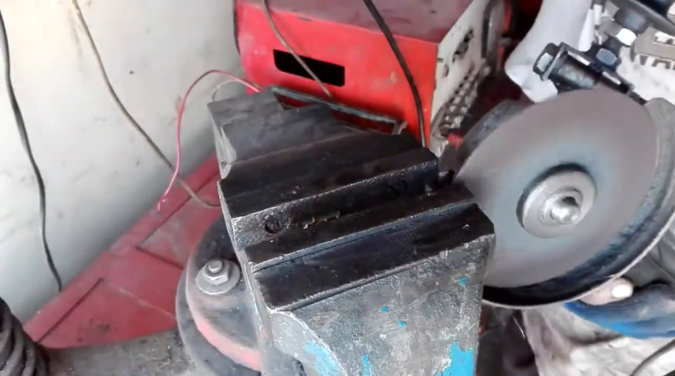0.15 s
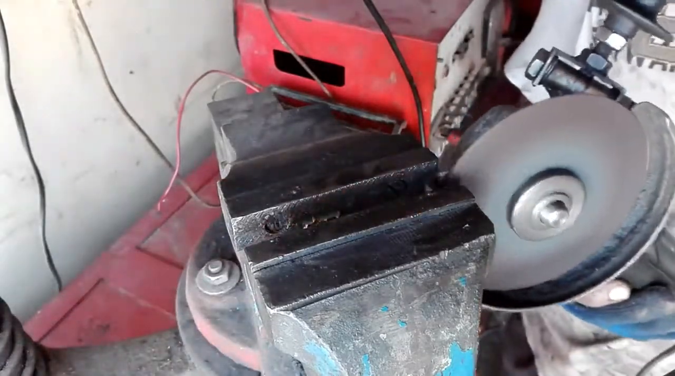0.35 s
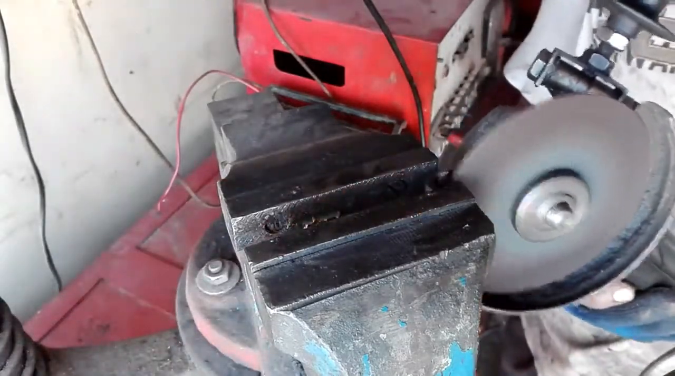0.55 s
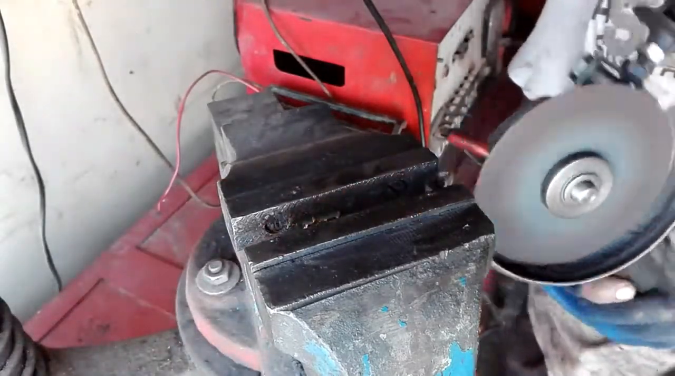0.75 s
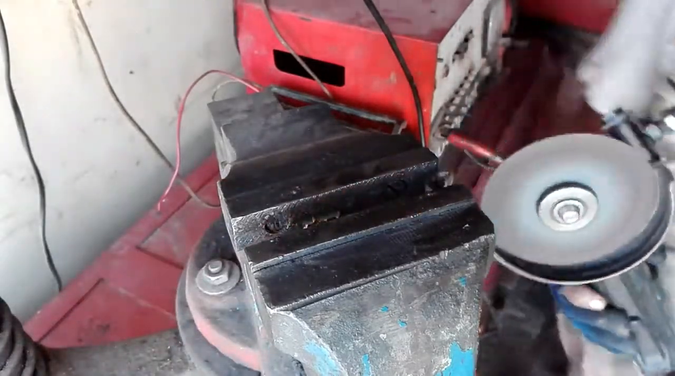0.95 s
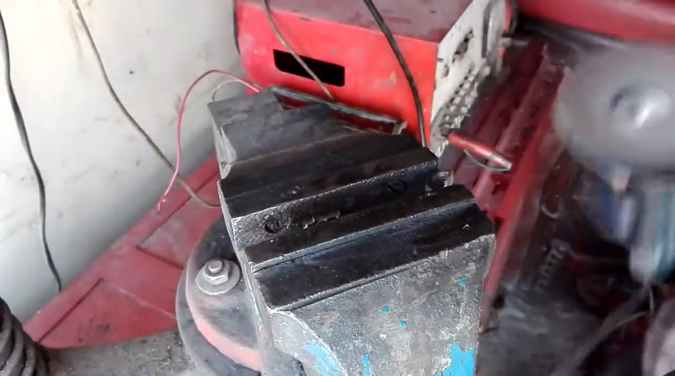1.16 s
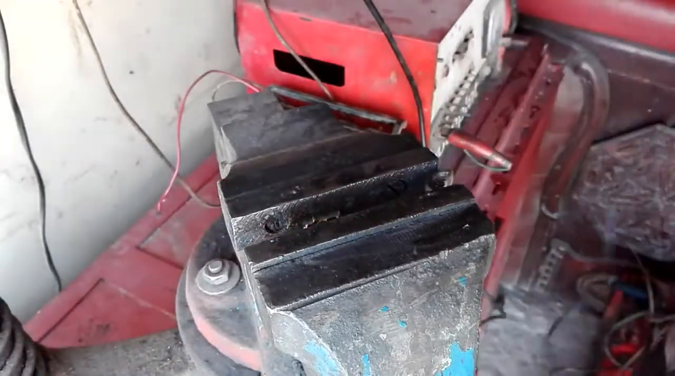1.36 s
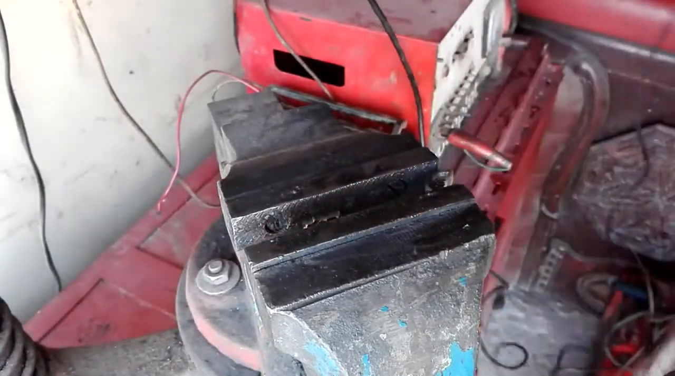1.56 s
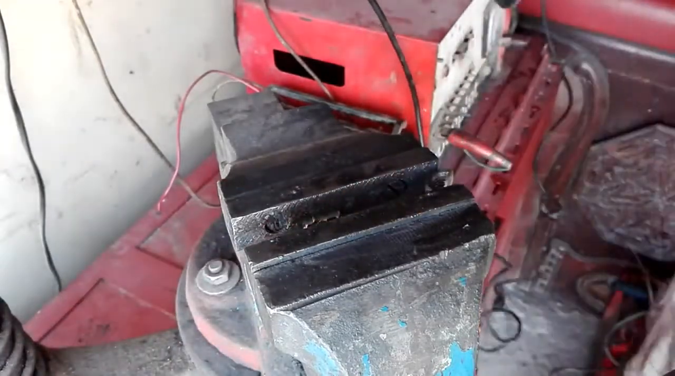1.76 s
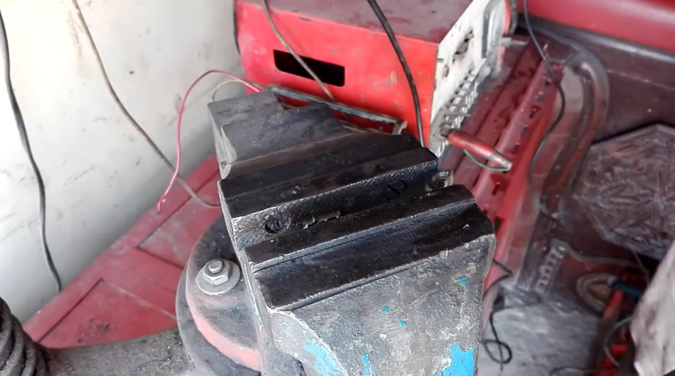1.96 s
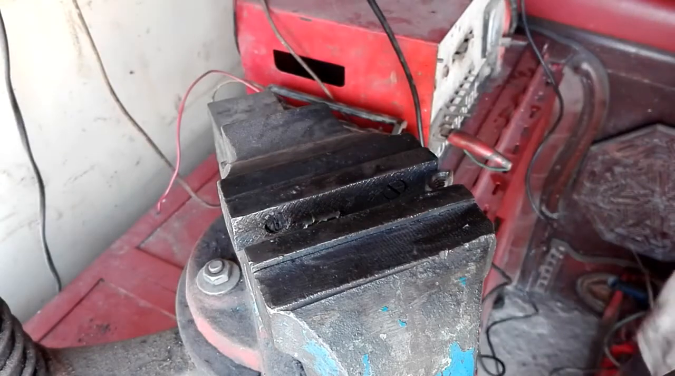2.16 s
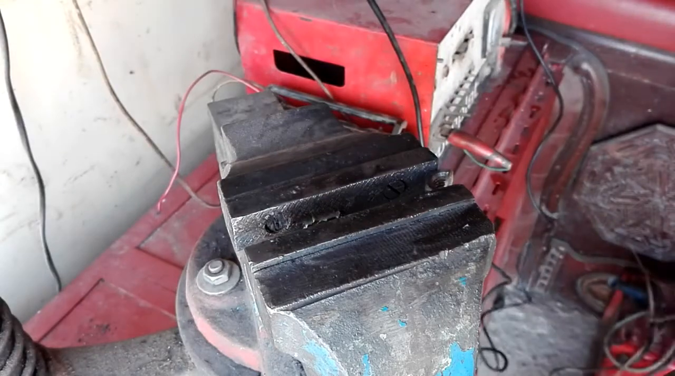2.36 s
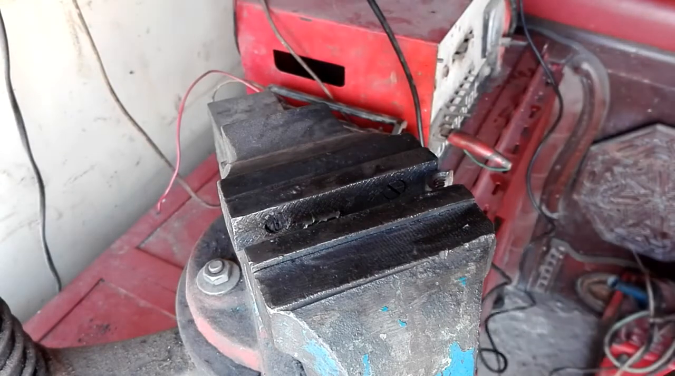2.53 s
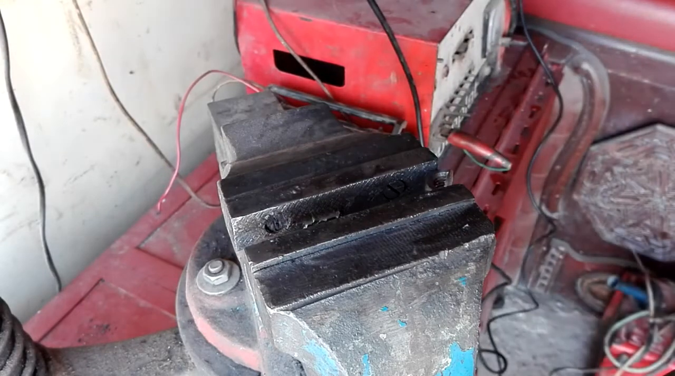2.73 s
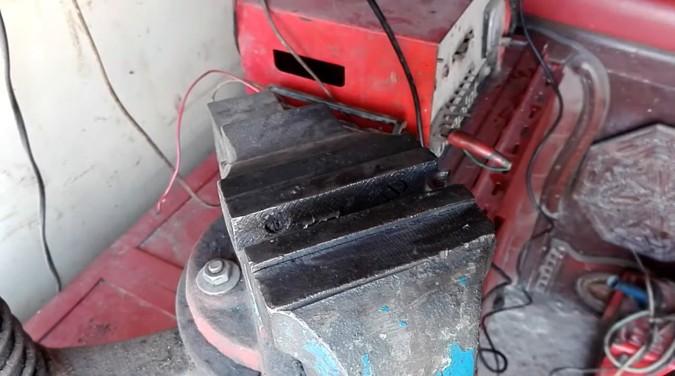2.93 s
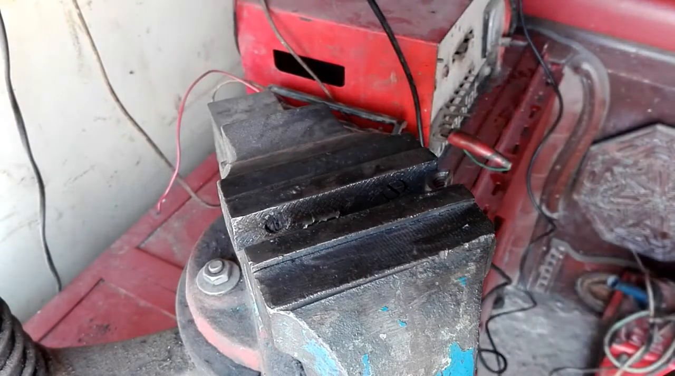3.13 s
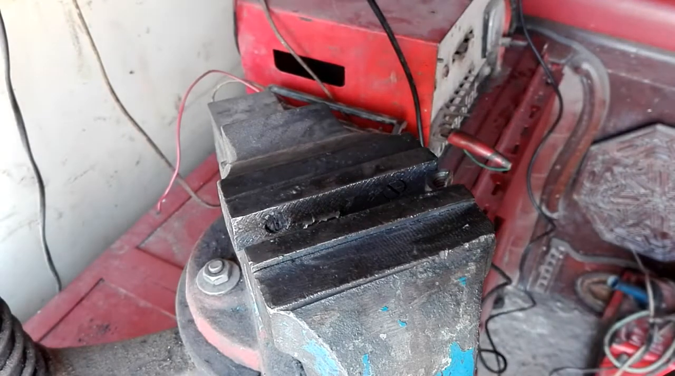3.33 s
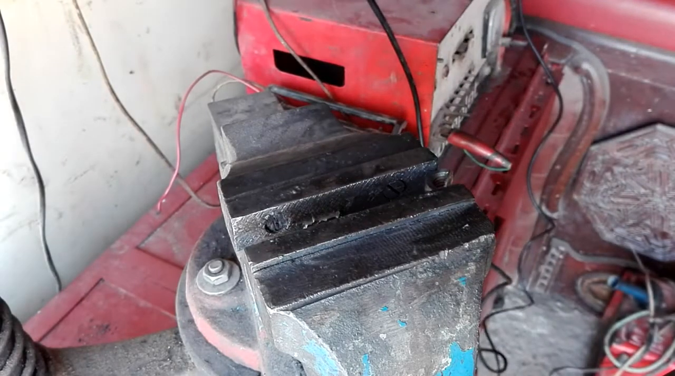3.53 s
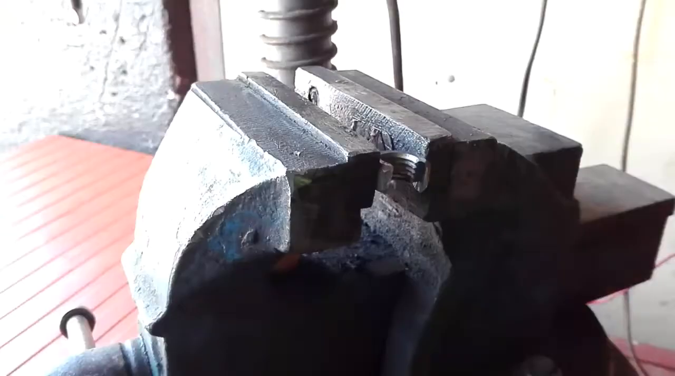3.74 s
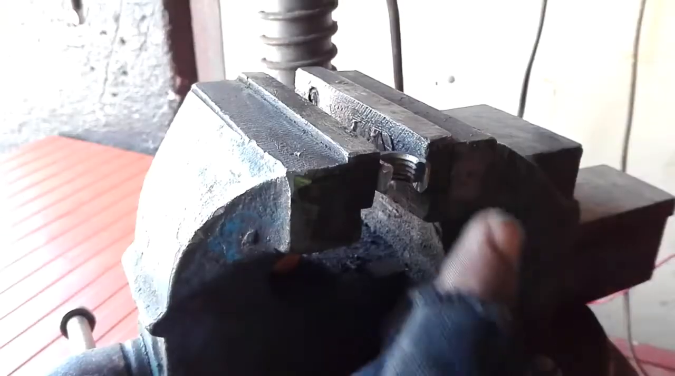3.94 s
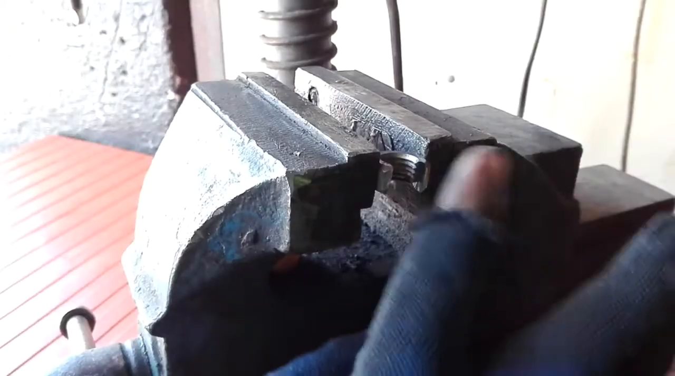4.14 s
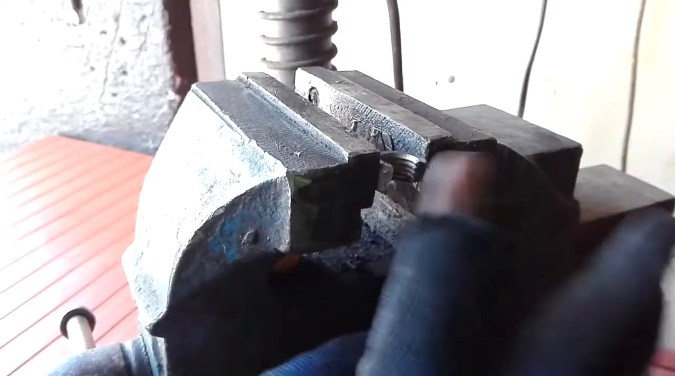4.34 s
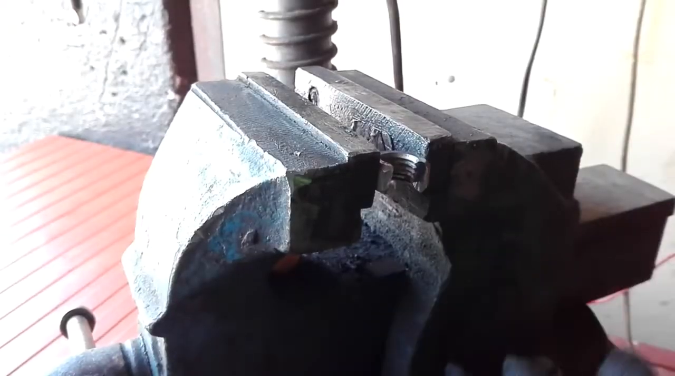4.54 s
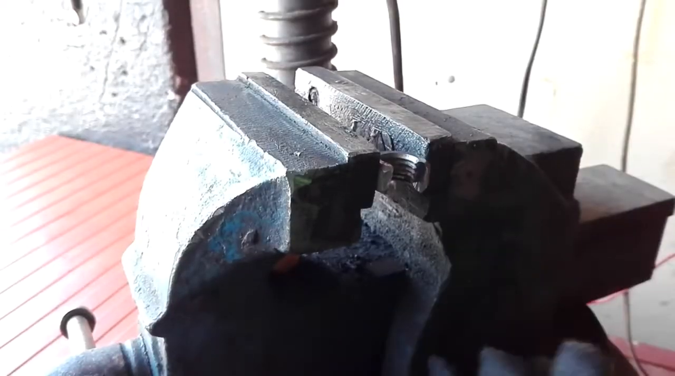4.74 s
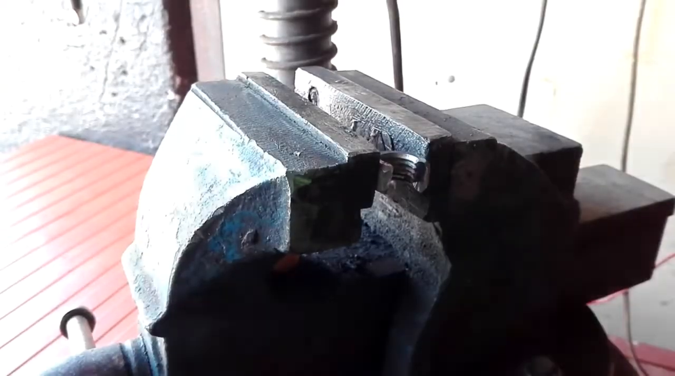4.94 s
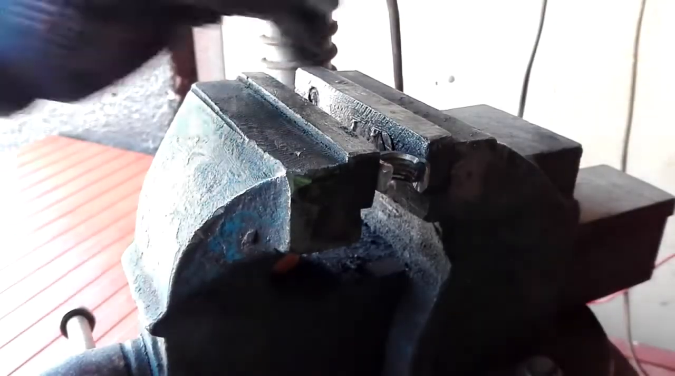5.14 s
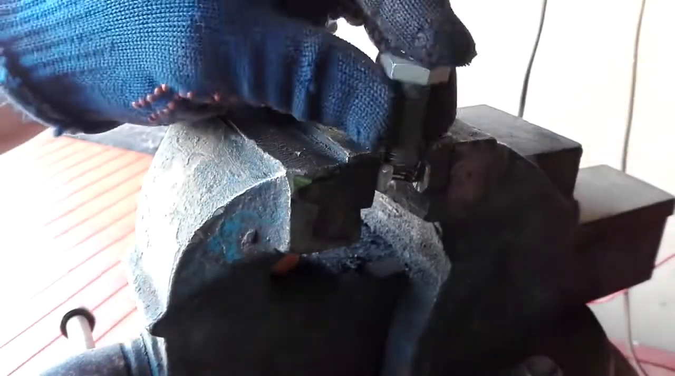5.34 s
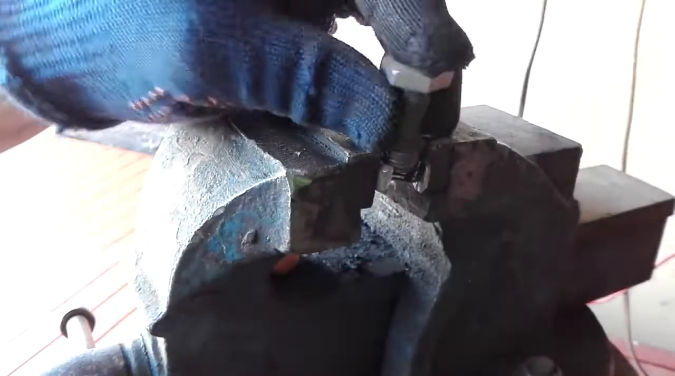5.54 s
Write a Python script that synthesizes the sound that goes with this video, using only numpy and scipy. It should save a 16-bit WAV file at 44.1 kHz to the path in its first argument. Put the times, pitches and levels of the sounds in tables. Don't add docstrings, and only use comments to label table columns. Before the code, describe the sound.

Close in a small workshop, an angle grinder finishes cutting steel in a vise: a harsh bright hiss, then stuttering bites. Switched off, it whirrs down, disc chattering and slack gears rattling, with a soft knock as it is laid on the bench. After a brief silent cut, a low far engine hum remains, with tiny ticks of fingers on metal. Close single microphone, same in both channels, slightly overloaded at the start.

```python
import sys
import numpy as np
from scipy import signal
from scipy.io import wavfile
from scipy.ndimage import uniform_filter1d

SR = 44100
rng = np.random.default_rng(int(sys.argv[2]) if len(sys.argv) > 2 else 0)


def file_out(sig):
    cols = np.atleast_2d(sig).T
    lim = np.clip(cols, -1, 1)
    pcm = np.round(lim * 32767).astype(np.int16)
    wavfile.write(sys.argv[1], SR, pcm)


def makeup_ratio(level_db):
    decades = np.asarray(level_db, float) / 20
    return 10 ** decades


N = 246511
T = np.arange(N) / SR

FIRST_CUT = .21
STOP_S = 3.872
LAID_DOWN = (1.9, 2.15)
CHANGE = (3.8245, 3.845)

# (start [s], length [s], level [dB], thump [dB], share below the bright split [dB])
BITES = [
    (0.0, FIRST_CUT, -6.5, -28, -2),
    (.263, 0.025, -8, -22.5, 3),
    (0.301, 0.024, -8.5, -25, 1),
    (0.39, 0.016, -6, -27.5, -2),
    (0.46, .004, -15.5, -40, 3),
    (0.481, 0.032, -8.5, -27.5, 3.5),
    (0.575, 0.019, -10, -27.5, 4.5),
    (0.675, 0.018, -9, -25, 0.5),
    (0.699, 0.0089, -15.5, -33.5, 2),
    (0.728, 0.013, -10.5, -30, 0),
]
# (centre [Hz], width [Hz], level [dB])
BITE_MODES = [(3010, 70, -4), (3830, 50, -8), (4310, 50, -3), (5470, 80, -5), (7490, 150, -6),
              (7910, 100, -7), (9280, 190, -6), (9650, 40, -6), (9880, 50, -7), (10460, 70, -4),
              (11500, 220, -7), (13430, 60, -5), (13610, 100, -1), (14380, 110, -6)]
# (frequency [Hz], density [dB per Hz])
BITE_AIR = [(410, -35), (700, -23), (2570, -12), (2920, 0.5), (4830, -7), (5500, -2.5), (6580, -7),
            (9320, -2.5), (12700, -1.5), (13900, 1.5), (15200, -4.5)]
# (frequency [Hz], level [dB])
VISE_THUMP = [(30, -5.5), (120, 4), (500, -1.5), (1000, -5), (1500, -5.5), (2500, -32), (4000, -59.5)]

# (time [s], gear noise at full speed [dB])
FACING = [(.22, -14), (1.27, -14), (1.44, -21), (1.66, -18), (1.85, -17), (2.03, -19.5), (2.3, -15),
          (2.55, -17), (2.71, -15.5), (3.04, -14.5), (3.83, -16)]
# (centre [Hz], width [Hz], level [dB])
HAND_MODES = [(532, 40, -16), (690, 25, -21.5), (1597, 55, -12), (2085, 60, -12.5), (2360, 150, -9.5),
              (3043, 130, -2.5), (3233, 76, -1), (3360, 210, -1.5), (3800, 130, -4.5), (4030, 230, -3),
              (4240, 61, -3.5), (4300, 64, -4), (4850, 130, -9), (5180, 280, -16), (6070, 79, -2.5),
              (6260, 85, -15.5), (7600, 470, -6), (9100, 600, -15), (13300, 1800, -16)]
# (centre [Hz], width [Hz], level [dB])
BENCH_MODES = [(414.7, 26, 0), (537, 43, -2), (893, 34, -13.5), (1340, 260, -12), (1447, 25, -4.5),
               (1770, 22.7, -19), (1870, 47, -2.5), (2060, 140, -5), (2964, 53, -16.5), (3186, 330, -2.5),
               (3383, 130, 1), (3990, 62, -4), (4570, 590, -9), (5150, 190, -8.5), (6600, 93, -38),
               (8030, 750, -15.5)]
# (frequency [Hz], density [dB per Hz])
HAND_AIR = [(240, -50.5), (400, -14.5), (633, -22.5), (1190, -18.5), (1610, -12), (2790, -6), (3160, -6.5),
            (3910, 1), (5730, -9), (7670, -7.5), (10600, -15.5), (15500, -16)]
# (frequency [Hz], density [dB per Hz])
BENCH_AIR = [(180, -38.5), (300, -8), (411, -8.5), (1110, -17), (1470, -6), (2750, -6.5), (3250, -8.5),
             (3640, -8), (7800, -12.5), (15600, -18.5)]
# (centre [Hz], by speed [dB per dB], by facing [dB per dB])
HAND_DRIFT = [(600, 1.7, -1.2), (1000, 2, -0.66), (1800, 2, -0.25), (3750, 0, 0), (6895, 2.03, -1.22),
              (12500, 1.65, -1.14)]
# (centre [Hz], by speed [dB per dB], by facing [dB per dB])
BENCH_DRIFT = [(500, -0.44, -0.13), (1780, -0.33, -0.042), (3740, -0.2, -0.026), (7170, 0.12, -0.33),
               (12500, 0.18, -.4)]
# (frequency [Hz], level [dB])
TOOTH = [(800, -1.5), (2800, -1), (5600, -3.5), (8000, 1.5), (14000, -5.5)]

# (time [s], case peak [dB], guard ring against it [dB], length [s])
CHATTER = [(0.344, 3, -5, 0.021), (0.772, -3, -5, 0.017), (0.832, -15.5, -12, 0.0044),
           (0.88, -3.5, -17, 0.026), (0.949, -4, -8, 0.0059), (1.064, -7.5, -15, 0.028),
           (1.143, -8.5, -7.5, 0.0068), (1.181, -4, -4.5, 0.011), (1.219, -5, -11.5, 0.0055),
           (1.2565, -4, -9.5, 0.0078), (1.282, -5.5, -3, 0.02), (1.304, -9, -3.5, 0.027),
           (1.3344, -11, 1.5, 0.013), (1.369, -13, 6.5, 0.023), (1.414, -13.5, 5.5, 0.007),
           (1.493, -8, -16.5, 0.029), (1.526, -9.5, 3, 0.015), (1.536, -13.5, 1.5, 0.008),
           (1.612, -6.5, -7, 0.015), (1.633, -7, -5.5, 0.008), (1.744, -1, -7.5, 0.0076),
           (1.752, -2.5, -10, 0.021), (1.856, -13.5, -7, 0.04), (1.876, -8, -2, 0.016),
           (1.887, -3.5, -6.5, 0.02), (1.907, -10.5, -6.5, 0.013), (1.917, -13, -4, 0.0098),
           (1.928, -7, -9, 0.022), (2.194, -8, -1.5, 0.012), (2.206, -8.5, -1.5, 0.011),
           (2.303, -12.5, -15, 0.03), (2.424, -10.5, -14.5, 0.025)]
# (centre [Hz], width [Hz], level [dB])
CASE = ([(700, -46.5), (1500, -26.5), (3000, -14.5), (4200, -1.5), (5500, -9), (7000, -39), (16000, -53)],
        [(3250, 350, 4.5), (3700, 240, 2), (5320, 110, -5.5)])
# (centre [Hz], width [Hz], level [dB])
GUARD = ([(4000, -38.5), (6500, -13.5), (8500, -1.5), (10000, -16.5), (12000, -19.5), (16000, -25)],
         [(7580, 380, 6.5), (8300, 95, -4.8), (9500, 340, -5)])

# (time [s], peak [dB], upper ring against it [dB])
GEAR_KNOCKS = [(1.9853, -15, -16), (1.9947, -9, -16.5), (2.0187, -12.5, -13.5), (2.0416, -13, -13.5),
               (2.0735, -14.5, -14), (2.0735, -9.5, -19), (2.093, -10.5, -18), (2.1339, -10.5, -17.5),
               (2.1723, -12, -13), (2.1953, -9, -13), (2.2367, -10.5, -13), (2.2876, -11, -13),
               (2.312, -10.5, -13.5), (2.3594, -10, -13.5), (2.3933, -13, -13.5), (2.4257, -13, -14),
               (2.5071, -13, -13), (2.5465, -16, -13), (2.5669, -17.5, -13), (2.6033, -17.5, -9),
               (2.6228, -18.5, -11.5), (2.6597, -19.5, -9), (2.6737, -17, -8), (2.7001, -15.5, -11),
               (2.7271, -9.5, -13.5), (2.771, -9.5, -20), (2.7959, -14, -13), (2.8413, -19, -9),
               (2.8618, -11, -13), (2.8992, -17, -13.5), (2.9471, -13.5, -15), (2.968, -17, -11.5),
               (2.995, -20, -16), (3.0049, -19, -15.5), (3.0294, -16.5, -11.5), (3.0663, -17, -12.5),
               (3.1272, -20, -15), (3.1735, -18, -14), (3.2055, -20, -11), (3.2459, -13.5, -13.5),
               (3.2828, -18.5, -11), (3.2978, -17.5, -9), (3.3262, -21, -17), (3.3407, -14.5, -24),
               (3.3741, -23, -17), (3.3985, -22.5, -13), (3.4145, -17.5, -12), (3.4315, -22, -9.5),
               (3.4953, -25.5, -13.5), (3.5302, -20, -18), (3.5667, -23, -17.5), (3.5751, -22.5, -18.5),
               (3.6041, -26, -19), (3.6545, -29, -19), (3.7198, -26, -23), (3.7892, -34, -15.5)]
# (time [s], peak [dB])
HIGH_KNOCKS = [(2.1909, -18), (2.2432, -24), (2.2637, -20.5), (2.2801, -20), (2.3011, -19.5),
               (2.325, -17.5), (2.3764, -19.5), (2.3959, -21.5), (2.4383, -20.5), (2.4652, -22.5),
               (2.4867, -24.5), (2.5081, -21.5), (2.5291, -20), (2.5475, -25), (2.5665, -21.5),
               (2.6034, -24), (2.6219, -25), (2.6398, -22.5), (2.6598, -20.5), (2.6827, -19.5),
               (2.7266, -19), (2.7496, -25.5), (2.7705, -25.5), (2.795, -23), (2.8189, -23.5),
               (2.8354, -23.5), (2.8613, -21.5), (2.8758, -21.5), (2.8987, -25), (2.9192, -26),
               (2.9446, -26), (2.9706, -26), (3.0065, -24.5), (3.0299, -23), (3.0669, -22), (3.1068, -27),
               (3.1831, -27.5), (3.2001, -26.5), (3.224, -28), (3.242, -25), (3.2624, -24), (3.2829, -23),
               (3.2983, -25), (3.3392, -32.5), (3.3856, -33), (3.3991, -28.5), (3.4146, -26.5),
               (3.4315, -27), (3.4515, -32.5), (3.5303, -30)]
# (centre [Hz], width [Hz], level [dB])
KNOCK_LOW = ([(800, -42), (2000, -24.5), (3300, -16), (5000, -22), (9000, -33)], [(3330, 260, 1),
             (4080, 130, -5), (2000, 120, -7), (1450, 160, -12)])
# (centre [Hz], width [Hz], level [dB])
KNOCK_HIGH = ([(3000, -41.5), (5200, -16), (8000, -24), (15000, -31.5)], [(5330, 220, 2), (4710, 150, -4),
              (7400, 300, -4.5)])

# (time [s], peak [dB], length [s])
PINGS = [
    (.771, -16, .006),
    (0.843, -15.5, .004),
    (0.885, -15.5, 0.0051),
    (.949, -14, 0.0045),
    (1.067, -17, .014),
    (1.616, -20.5, 0.0015),
]
# (centre [Hz], width [Hz], level [dB])
RIM = ([(3000, -36), (8000, -15.5), (9500, -9), (12000, -19), (15500, -25.5)], [(9200, 860, 1),
       (10390, 400, -3.5)])
# (frequency [Hz], level [dB], decay to -60 dB [s])
BENCH_KNOCK = (2.087, -19, [(545, 0, .09), (1350, -2, .05), (1900, -4, .04), (950, -9, .04), (700, -6, .05),
               (430, -6, .06)])
# (from [s], to [s], rise [s], level [dB], modes (centre [Hz], width [Hz], level [dB]))
BOARDS = [
    (.95, 1.27, .08, -31, [(2300, 700, 0)]),
    (0.46, 1.0, .1, -27.5, [(6000, 1500, 0.5), (3180, 500, -1)]),
    (2.14, 2.7, .03, -35, [(2013, 120, 1.5), (1450, 140, -8)]),
    (2.15, 2.6, 0.0492, -42, [(540, 36, 1.5)]),
    (3.07, 3.4, .05, -41, [(2040, 120, -1.5), (558, 36, 6)]),
]

# (time [s], peak [dB], centre [Hz], length [s])
FINGER_TICKS = [(3.922, -41.5, 9100, 0.011), (4.047, -50, 6040, 0.0096), (4.102, -43, 5050, 0.012),
                (4.145, -39, 4480, 0.016), (4.189, -46, 12050, .012), (4.361, -48.5, 11700, 0.013),
                (4.502, -45.5, 11070, .014), (5.127, -46.5, 8300, .02), (5.178, -42.5, 7820, 0.019),
                (5.231, -46.5, 7970, 0.021), (5.33, -46, 7600, 0.0131), (5.429, -34, 4200, 0.014),
                (5.507, -47, 9500, 0.0305), (5.559, -51, 8600, .02)]
# (centre [Hz], width [Hz], level [dB])
NUT_MODES = [(2850, 250, 2), (3950, 250, 2), (4690, 300, 1), (5900, 300, 1), (7300, 250, 2), (8260, 200, 4),
             (10700, 200, 3), (12900, 150, 4), (13900, 150, 4)]
# (from [s], to [s], level [dB])
RUSTLE = (3.91, 4.21, -56)

# (time [s], firing rate [Hz], level [dB])
DRONE = [
    [(1.5, 84.7, -39), (1.87, 86.4, -40), (2.51, 88.2, -35), (2.67, 88.1, -34), (3.37, 90.3, -31.5),
     (3.82, 93.1, -28.5)],
    [(3.86, 76.2, -29), (4.08, 77.6, -37.5), (4.28, 79.8, -33), (4.65, 81.5, -37), (5.59, 86, -36.5)],
]
# (from [s], to [s], start [Hz], end [Hz], level [dB])
FAINT_LINES = [(0, 1.6, 82, 84, -44.5), (0.75, 2.05, 352, 380, -46), (.7, 2.6, 400, 420, -49),
               (0.3, 3.8, 268, 280, -50.5), (.7, 2.5, 220, 238, -42), (2.85, 3.2, 885, 885, -50),
               (4.65, 5.3, 410, 425, -52), (1.94, 1.99, 550, 550, -42), (0.602, 2.2, 180, 188, -47.5),
               (4, 5.0, 154, 168, -45.5), (3.9, 5.3, 258, 290, -48.5), (4, 5.6, 56, 69, -40.5),
               (4.5, 5.6, 222, 240, -48), (4.6, 5.6, 122, 150, -46.5), (1.2, 1.9, 692, 692, -57),
               (.8, 1.6, 530, 530, -54), (2.25, 2.5, 880, 880, -53), (1.925, 2.055, 6770, 6310, -36)]
# (from [s], to [s], rise [s], level [dB], modes (centre [Hz], width [Hz], level [dB]))
SWELLS = [
    (4.98, 5.44, .1, -52, [(2260, 160, 0.5), (2820, 250, -5), (1874, 200, -3)]),
    (3.88, 4.27, .2, -53.5, [(2770, 550, 0), (1400, 404, -2), (4000, 516, -5)]),
    (5.28, 5.9, .03, -53, [(2320, 250, 0), (2870, 250, -1)]),
    (4.5, 4.92, 0.103, -56, [(1470, 220, -2), (1100, 120, -0.5)]),
]
# (frequency [Hz], density [dB per Hz])
RUMBLE = [(12, -46), (20, -12), (59, -8), (85, -4), (129, -10), (273, -11), (346, -23.5), (412, -16),
          (624, -32), (900, -35.5), (1170, -54.5), (1980, -120)]
# (frequency [Hz], density [dB per Hz])
ROOM_HISS = [(290, -38), (500, -7.5), (686, -10), (759, -9.5), (1090, -6), (1260, -5), (1450, -5),
             (2300, -9.5), (5380, -16.5), (13000, -27), (15600, -24.5)]
# (from [s], to [s])
DROPOUT = (5.452, 5.4655)


def cutting():
    bright_hz = 8600
    grains = rng.standard_normal(N) * makeup_ratio(2.3 * wander(hz=150.6))
    hiss = patchy(colour(evened(grains), BITE_AIR, BITE_MODES, modes_db=9.0), patchy_db=3.0)
    dull = signal.filtfilt(*signal.butter(4, bright_hz, fs=SR), hiss)
    shake = colour(rng.standard_normal(N), VISE_THUMP)
    out = np.zeros(N)
    for s, length, db, thump_db, dull_db in BITES:
        bite = hiss + (makeup_ratio(dull_db) - 1) * dull
        out += makeup_ratio(db) * bite * gate(s, length, rise=0.0022, fall=0.0058)
        out += makeup_ratio(thump_db) * shake * gate(s, 0.86 * length, rise=.002, fall=0.0024)
    return out


def coasting():
    share = np.clip(np.interp(T, [0, 0.88, *LAID_DOWN], [.37, 0.38, 0.38, .45]), 0, 1)
    flutter = np.cos(2 * np.pi * np.cumsum(50 + 12 * wander(hz=3.916)) / SR)
    slack = makeup_ratio(1.8 * wander(hz=90) + 3.2 * flutter)
    teeth = evened(clicks(per_s=2200, spread_db=2.6) * slack)
    air = rng.standard_normal(N)
    drive = np.sqrt(1 - share) * air + np.sqrt(share) * colour(teeth, TOOTH)

    held = retint(colour(drive, HAND_AIR, HAND_MODES, modes_db=3.0), 1.323, HAND_DRIFT)
    lying = retint(colour(drive, BENCH_AIR, BENCH_MODES, modes_db=4.5), 3.02, BENCH_DRIFT)
    down = np.clip((T - LAID_DOWN[0]) / (LAID_DOWN[1] - LAID_DOWN[0]), 0, 1)
    body = makeup_ratio(1.5) * np.sqrt(1 - down) * held + makeup_ratio(2.0) * np.sqrt(down) * lying
    gears = makeup_ratio(curve(FACING, index=1) + speed_db(T)) * body
    return (gears + rotor_slots()) * (T < CHANGE[0])


def rotor_slots():
    rest_hz, swing_hz, swing_at_s, swing_s = 1082, 45, .48, .07
    level = makeup_ratio(-36.5 + 2.2 * wander(hz=7.7)) * gate(.29, .6, rise=.04, fall=.05)
    swing = swing_hz * np.exp(-((T - swing_at_s) / swing_s) ** 2)
    pitch_hz = rest_hz + swing + 11 * wander(hz=22)
    return level * np.sin(2 * np.pi * np.cumsum(pitch_hz) / SR)


def loose_disc():
    bounce_s, bounce_db = .0113, -7
    case, guard = np.zeros((2, N))
    for s, db, ring_db, length in CHATTER + light_touches():
        shape = scrape(s, length, grit_db=2.2, rise=.12 * length + .0006)
        beat = np.arange(len(shape)) / SR / bounce_s % 1
        shape = shape * evened(makeup_ratio(bounce_db * beat))
        add(case, s, makeup_ratio(db - 11.5) * shape)
        add(guard, s, makeup_ratio(db + ring_db - 6.0) * shape)
    noise = rng.standard_normal(N)
    return colour(case * noise, *CASE) + colour(guard * noise, *GUARD)


def light_touches():
    gap_s, end_s, spread_db = .06, 1.25, 0.5
    touches = []
    for slot in np.arange(FIRST_CUT, end_s, gap_s):
        late, size, ring = rng.random(3)
        s = slot + gap_s * late
        db = -11.5 + speed_db(s) + spread_db * (2 * size - 1)
        ring_db = -7.5 + spread_db * (2 * ring - 1)
        touches.append((s, db, ring_db, 0.014))
    return touches


def slack_gear():
    knock_s = .0022
    low, high = np.zeros((2, N))
    for s, db, high_db in GEAR_KNOCKS:
        shape = scrape(s, knock_s, grit_db=-2.0)
        add(low, s, makeup_ratio(db - 7.5) * shape)
        add(high, s, makeup_ratio(db + high_db - 4.0) * shape)
    for s, db in HIGH_KNOCKS:
        add(high, s, makeup_ratio(db - 5.0) * scrape(s, 2 * knock_s, grit_db=1.0))
    noise = np.sign(rng.standard_normal(N))
    return colour(low * noise, *KNOCK_LOW) + colour(high * noise, *KNOCK_HIGH)


def rim_pings():
    out = np.zeros(N)
    for s, db, length in PINGS:
        add(out, s, makeup_ratio(db) * scrape(s, length, grit_db=2.0))
    return colour(out * rng.standard_normal(N), *RIM)


def bench_knock():
    s, db, modes = BENCH_KNOCK
    t = np.maximum(T - s, 0)
    ring = sum(makeup_ratio(d - 60 * t / t60) * np.sin(2 * np.pi * hz * t) for hz, d, t60 in modes)
    return makeup_ratio(db + 4.5) * ring * np.clip(t / 0.003, 0, 1)


def fingers():
    start, stop, db = RUSTLE
    cloth = colour(rng.standard_normal(N), [(3000, -15.5), (6000, -4), (11000, -2.0), (15500, 1.5)])
    rubbing = makeup_ratio(db + 2.5 * wander(hz=40)) * cloth * gate(start, stop - start, rise=.03, fall=.15)
    return nut_ticks() + rubbing


def nut_ticks():
    detune, spread_db = .03, 3
    out = np.zeros(N)
    for s, db, hz, length in FINGER_TICKS:
        shape = scrape(s, length, grit_db=3.0)
        band = signal.butter(2, [hz / 2.3, min(hz * 1.3, .45 * SR)], "band", fs=SR, output="sos")
        a, b = 2 * rng.random((2, len(NUT_MODES))) - 1
        modes = np.array(NUT_MODES) * 1. + np.transpose([detune * a * hz, 0 * a, spread_db * b])
        rub = shape * evened(signal.sosfilt(band, rng.standard_normal(len(shape))))
        ring = evened(colour(rub, [(1000, 0), (15500, -12)], modes, modes_db=-2.))
        add(out, s, makeup_ratio(db - 6) * ring * rub.std())
    return out


def drone():
    out = np.zeros(N)
    for rows in DRONE:
        here = gate(rows[0][0], rows[-1][0] - rows[0][0], rise=0.012, fall=0.0098)
        level = makeup_ratio(curve(rows, index=2) + .6 * wander(hz=7))
        out += here * level * np.sin(2 * np.pi * np.cumsum(curve(rows, index=1)) / SR)
    for start, stop, from_hz, to_hz, db in FAINT_LINES:
        turns = np.cumsum(np.interp(T, [start, stop], [from_hz, to_hz])) / SR
        tone = makeup_ratio(db + 1.3 * wander(hz=6)) * np.sin(2 * np.pi * turns + .35 * wander(hz=6))
        out += tone * gate(start, stop - start, rise=0.023, fall=0.017)
    return np.sqrt(2) * out


def swells(rows):
    out = np.zeros(N)
    for start, stop, rise, db, modes in rows:
        band = colour(rng.standard_normal(N), [(500, -29.5), (4000, -30), (15000, -53.5)], modes)
        out += makeup_ratio(db + 2.0 * wander(hz=18)) * band * gate(start, stop - start, rise, fall=0.048)
    return out


def shop():
    rumble = colour(rng.standard_normal(N), RUMBLE) * makeup_ratio(0.78 * wander(hz=5.5))
    hiss = colour(rng.standard_normal(N), ROOM_HISS, [(2290, 470, -6.0), (2830, 253, -8.5)])
    hiss = patchy(hiss * makeup_ratio(0.58 * wander(hz=13)), patchy_db=1.5)
    rumble_db = np.where(T < CHANGE[0], -38.5, -41)
    return makeup_ratio(rumble_db) * rumble + makeup_ratio(-49.5) * hiss


def speed_db(t):
    return 2 * 10 * np.log10(np.clip(1 - t / STOP_S, .003, 1))


def retint(x, typical, drift):
    centres, by_speed, by_facing = np.transpose(drift)
    s, db = np.transpose(FACING)

    def tilt(hz, t):
        slowing = speed_db(t) - speed_db(typical)
        turning = np.interp(t, s, db) - np.interp(typical, s, db)
        speed_tilt = np.outer(np.interp(hz, centres, by_speed), slowing)
        facing_tilt = np.outer(np.interp(hz, centres, by_facing), turning)
        return np.clip(speed_tilt + facing_tilt, -20, 20)
    return patchy(x, 1.6, tilt)


def patchy(x, patchy_db, tilt=None):
    hz, t, z = signal.stft(x, SR, nperseg=256)
    patches = uniform_filter1d(rng.standard_normal(z.shape), size=3, axis=0)
    patches = uniform_filter1d(patches, size=20, axis=1)
    drift_db = tilt(hz, t) if tilt else 0
    return signal.istft(z * makeup_ratio(drift_db + patchy_db * evened(patches)), SR, nperseg=256)[1][:N]


def colour(x, points, modes=(), modes_db=0.):
    hz = abs(np.fft.fftfreq(8192, 1 / SR))
    f, db = np.transpose(points)
    power = makeup_ratio(2 * np.interp(np.log(hz + 1), np.log(f + 1), db)) * (hz / (hz + 12)) ** 2
    for centre, width, peak_db in modes:
        power = power + makeup_ratio(2 * (peak_db + modes_db)) / (1 + (2 * (hz - centre) / width) ** 2) ** 2
    log_size = np.log(power + 1e-10) / 2
    taps = np.fft.ifft(np.exp(np.conj(signal.hilbert(log_size)))).real[:4096]
    return signal.oaconvolve(x, taps / np.linalg.norm(taps))[:len(x)]


def scrape(s, length, grit_db, rise=.0006):
    t = np.arange(round(.08 * SR)) / SR
    grains = makeup_ratio(grit_db * evened(uniform_filter1d(rng.standard_normal(len(t)), size=60)))
    return evened(grains) * np.clip(t / rise, 0, 1) * np.exp(-(t / length) ** 2)


def clicks(per_s, spread_db):
    size = makeup_ratio(spread_db * np.minimum(rng.exponential(1, N), 4)) * rng.choice([-1., 1.], N)
    return evened(size * (rng.random(N) < per_s / SR))


def wander(hz):
    return evened(signal.sosfilt(signal.butter(2, hz, fs=SR, output="sos"), rng.standard_normal(N)))


def gate(start, length, rise, fall):
    return np.clip((T - start) / rise, 0, 1) * np.exp(-np.maximum(T - start - length, 0) / fall)


def curve(rows, index):
    rows = np.array(rows)
    return np.interp(T, rows[:, 0], rows[:, index])


def evened(x):
    return x / np.sqrt(np.mean(x ** 2) + 1e-20)


def add(mix, s, sound):
    part = mix[round(s * SR):][:len(sound)]
    part += sound[:len(part)]


def scene():
    tool = cutting() + coasting() + loose_disc() + slack_gear() + rim_pings() + bench_knock()
    workshop = fingers() + drone() + swells(SWELLS + BOARDS) + shop()
    mix = tool + workshop
    return np.array([mix, mix])


def band_limit(x):
    return signal.sosfilt(signal.butter(12, 15770, fs=SR, output="sos"), x)


def record(dry):
    fade_in_s = .13
    overloaded = 0.96 * dry / (1 + abs(dry) ** 6) ** (1 / 6)
    shots = (T < CHANGE[0]) + np.clip((T - CHANGE[1]) / fade_in_s, 0, 1)
    gap = np.clip(np.maximum(DROPOUT[0] - T, T - DROPOUT[1]) / .002, .01, 1)
    return band_limit(overloaded * shots * gap)


dry = scene()
out = record(dry)
file_out(out)
```